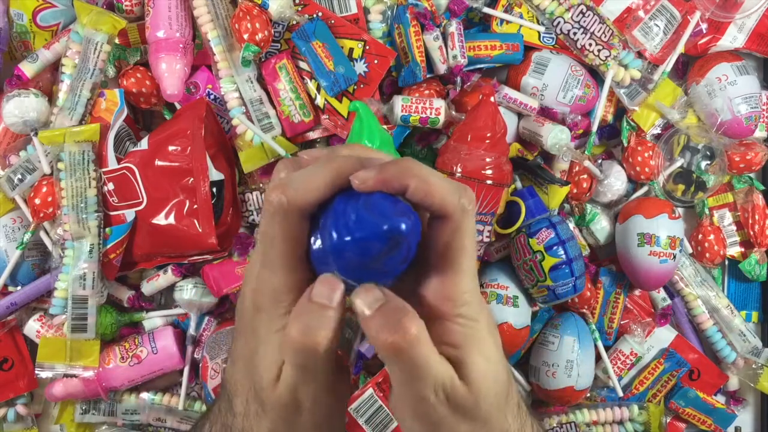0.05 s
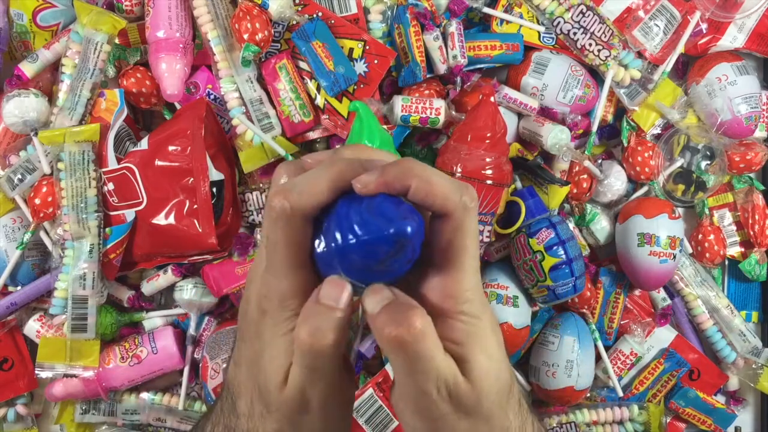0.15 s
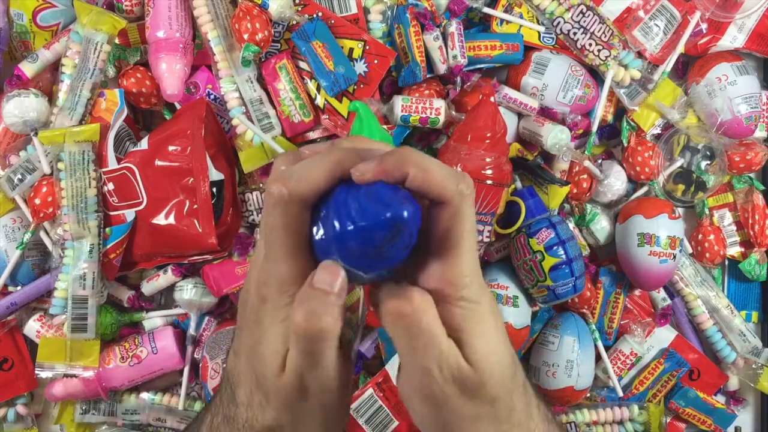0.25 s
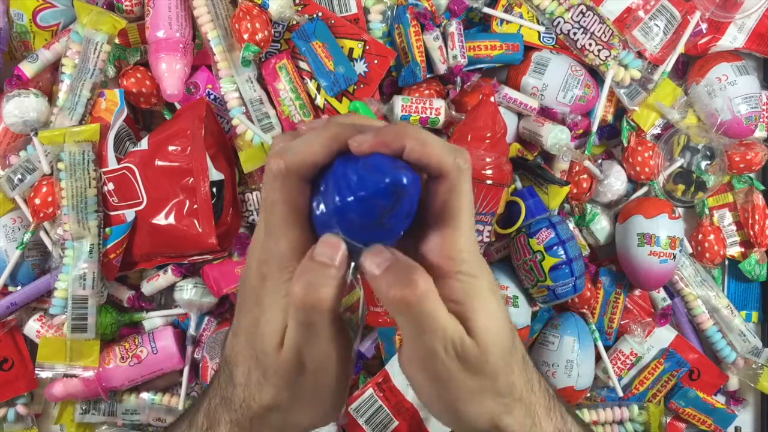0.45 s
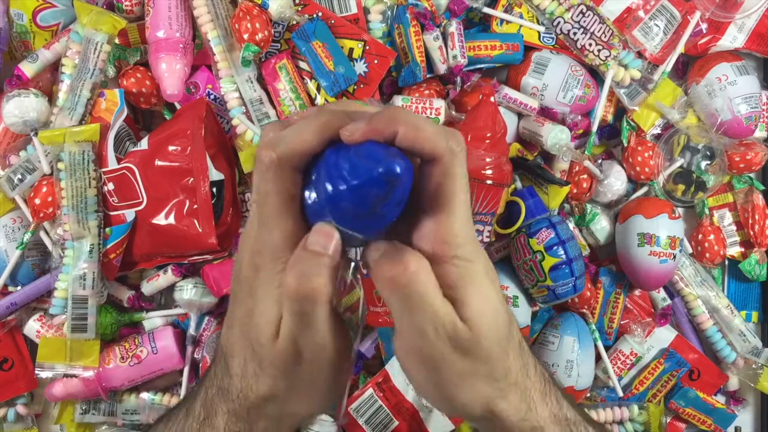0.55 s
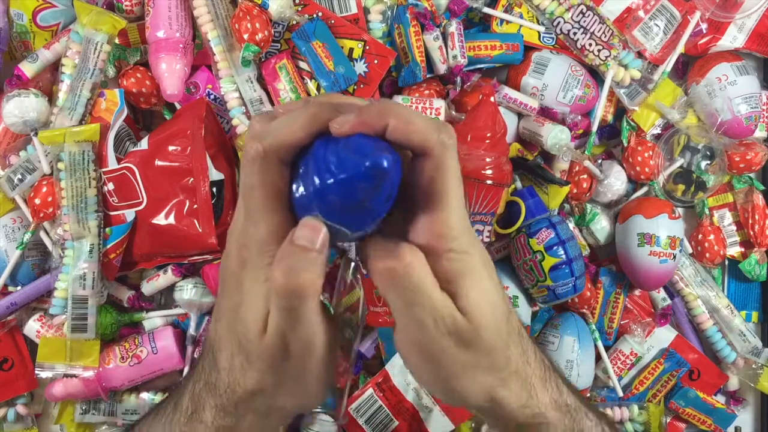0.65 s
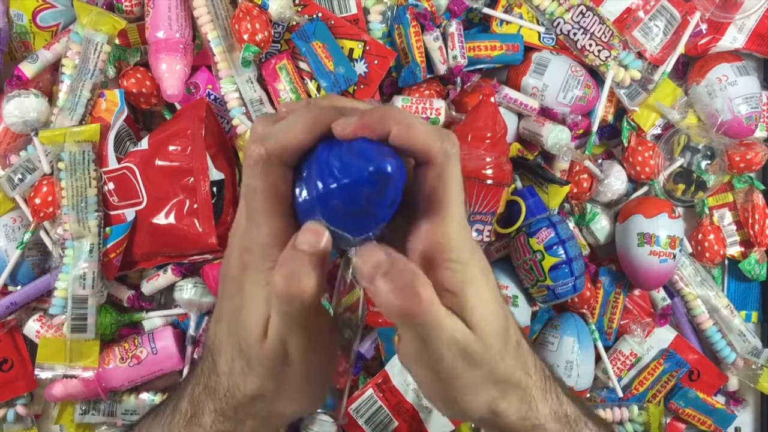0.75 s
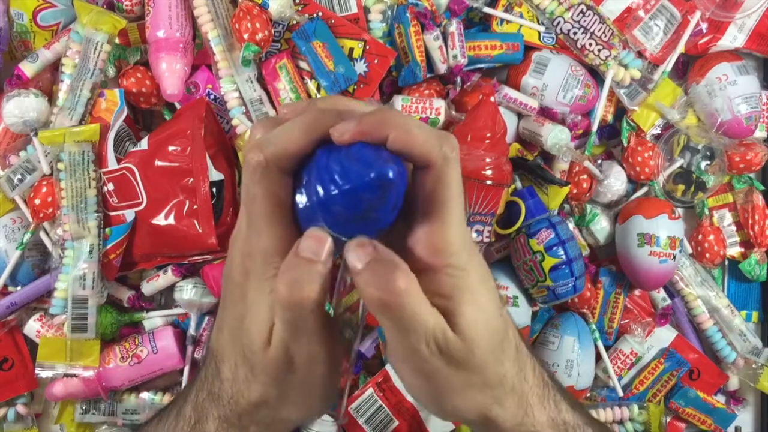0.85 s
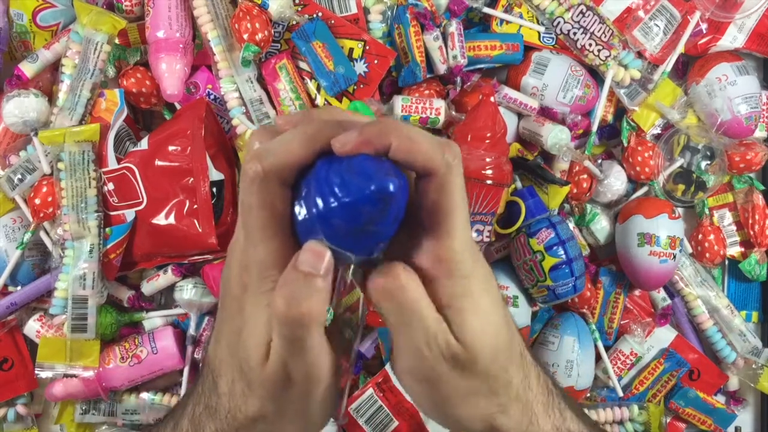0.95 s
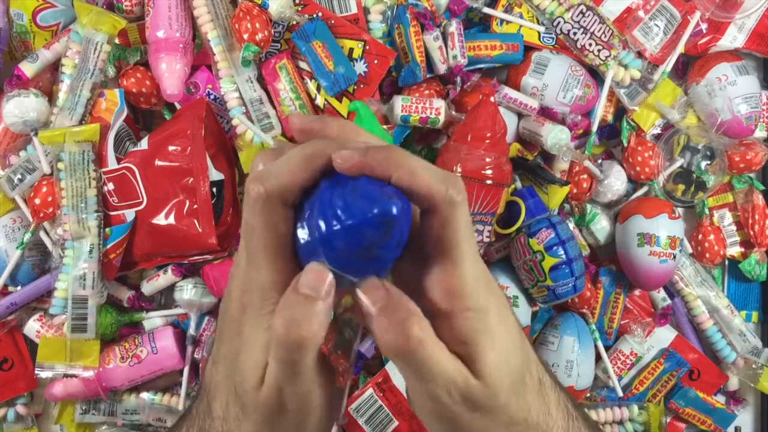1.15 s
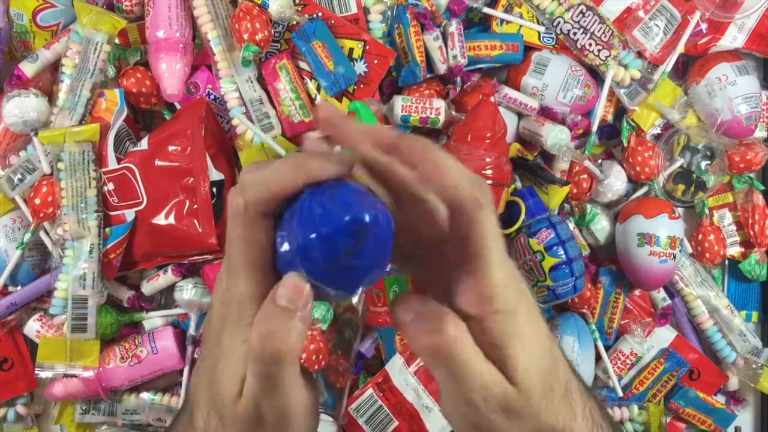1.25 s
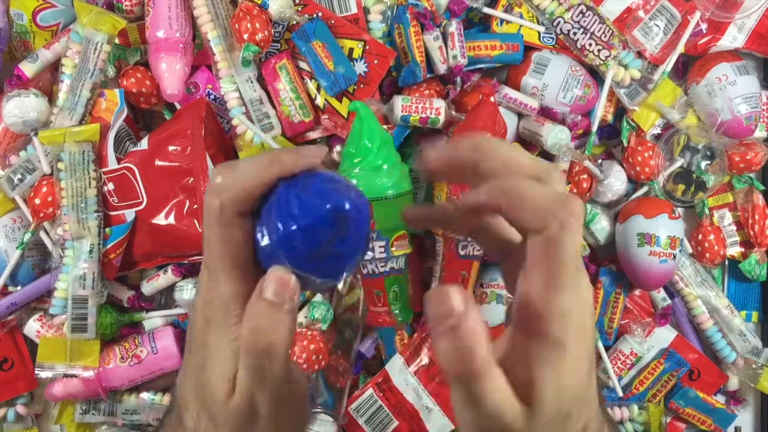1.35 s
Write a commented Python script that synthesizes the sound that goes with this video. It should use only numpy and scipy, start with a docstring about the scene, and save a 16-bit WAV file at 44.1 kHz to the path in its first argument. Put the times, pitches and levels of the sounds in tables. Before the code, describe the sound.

A hollow plastic candy shell snaps sharply in short clusters, close to the microphone in a small room, with fine film ticks; a dull low thud falls between clusters, then faint clicks die away.

```python
"""Sharp plastic snaps in short clusters, fine ticks and rustle, dull distant thuds, a faint squeak, hiss and rumble.
Hands twist a hollow plastic candy shell close to a microphone: each snap of its catch is a set of fading
tones plus a burst of bright noise. Thin film under the fingers is short bursts of high noise.
The thuds are low fading tones with a wash of noise, the squeak is one wavering sine, and a small room
answers the shell and film with fading noise echoes."""
import sys
import numpy as np
from scipy import signal
from scipy.fft import rfft, irfft
from scipy.io import wavfile
from scipy.ndimage import uniform_filter1d

SR = 44100
rng = np.random.default_rng(int(sys.argv[2]) if len(sys.argv) > 2 else 0)


def dump(signal):
    """Clip the signal to [-1, 1] and save it as 16-bit WAV at the path in sys.argv[1]."""
    limited = np.clip(np.atleast_2d(signal).T, -1, 1)
    pcm = np.round(limited * 32767).astype(np.int16)
    wavfile.write(sys.argv[1], SR, pcm)


N = 61739  # length in samples, 1.4 s
T = np.arange(N) / SR  # time of each sample, s


def undb(db):
    """Turn decibels into a plain multiplier."""
    return 10 ** (np.asarray(db) / 20)


def unit(x):
    """Scale to an average (RMS) level of 1."""
    return x / np.sqrt(np.mean(x ** 2))


def colour(x, points):
    """Make some pitches of a noise stronger than others, following (f/Hz, level/dB) points."""
    hz, db = np.array(points).T
    f = np.maximum(np.arange(len(x) // 2 + 1) * SR / len(x), 1)
    gain = undb(np.interp(np.log(f), np.log(hz), db))
    return irfft(rfft(x) * gain, len(x))


def butter(x, order, cut_hz, kind):
    """Filter with a smooth edge: keep the lows, the highs or a band between."""
    return signal.sosfilt(signal.butter(order, cut_hz, kind, fs=SR, output="sos"), x)


def band(x, hz, width_hz):
    """Keep a band of pitches around a centre, its top edge held below the highest possible pitch."""
    low_edge = hz - width_hz / 2
    high_edge = min(hz + width_hz / 2, .49 * SR)
    return butter(x, 2, [low_edge, high_edge], "band")


def ring(modes, scale, push_s, size):
    """A struck object sounds several fading tones (modes); a short half-sine push starts them. Peak 1."""
    t = T[:size]
    tones = np.zeros(size)
    for f, db, t60 in modes:
        fade = np.exp(-np.log(1000) * t / t60)  # down 60 dB after t60
        tones += undb(db) * fade * np.sin(2 * np.pi * f * scale * t)
    push = np.sin(np.pi * np.clip(T[:400] / push_s, 0, 1))
    x = np.convolve(tones, push)[:size]
    return x / np.abs(x).max()


def burst(length_s, size=1500):
    """A quick rise and slower fall in loudness: peak 1, a third of the way through the length."""
    u = 3 * T[:size] / length_s
    return u * np.exp(1 - u)


def add(out, x, s):
    """Mix a short sound into a longer one at time s."""
    i = int(s * SR)
    out[i:i + len(x)] += x[:N - i]


def shell():
    """Every snap rings the hollow shell and throws a short bright crack of noise that fizzles out."""
    # Snaps of the catch: [t/s, ring level/dB, main ring f/Hz, low modes boost/dB, high modes boost/dB,
    # crack level relative to ring/dB, crack length/s]
    snaps = [(0.1885, -21, 1884, -25, 2, -13.5, 0.0021), (0.1909, -29.5, 3430, -20, -6, -25, 0.0026),
             (0.201, -34, 1750, -6, 3, -18, 0.011), (0.2349, -23, 1840, -4, 0, -43, .002),
             (0.2357, -5, 1703, -10, -10, -16, 0.0038), (0.2418, -14.5, 1670, -5, -2, -3, 0.0011),
             (0.2423, -15.5, 1660, -5, -1.5, -18, 0.0032), (0.2676, -37, 1630, -6, -6, -27, .006),
             (.277, -27.5, 1820, -6, -6, -32, .006), (0.483, -36.5, 1780, 1, 0, -11.5, 0.0043),
             (.5703, -26.5, 1710, 8, -6, -14, .002), (.5713, -23.5, 1610, -17, -7, -15.5, 0.0023),
             (.5719, -10.5, 1646, -6, -23, -16.5, 0.0038), (0.601, -36.5, 1590, -10, 0, -2.5, 0.0077),
             (0.6027, -23.5, 1530, -2, -2, -13, 0.008), (.606, -12.5, 1916, -20, -10, -12, 0.0018),
             (0.672, -36, 1580, -6, -3, -29, .006), (0.9278, -15.5, 1840, -8, 0, -20, 0.001),
             (.9293, -6.5, 1703, 10.5, 2, -13, 0.0031), (0.955, -36.5, 1630, 0, 0, 3, 0.0041),
             (0.9599, -14, 1680, 15, 1, -7.5, 0.0023), (0.9629, -15, 1213, -19, 8, -17, 0.0074),
             (0.972, -17.5, 1610, 12, 2, -27, 0.0038), (0.9778, -22.5, 1610, 0, 0, -20, 0.0028),
             (1.1713, -42.5, 1810, 18, -4, 0, 0.0028), (1.2012, -27, 1310, 7, -4, -10.5, 0.002),
             (1.2224, -30.5, 1320, -3, 3, -12, 0.0042), (1.224, -30.5, 1570, -8, 6, -8, 0.0055),
             (1.2267, -31.5, 2150, -10, -6, -23, 0.0022), (1.2302, -34, 1310, 0, 1, -16, 0.005),
             (1.286, -48, 1460, 8, 0, -8.5, 0.0059), (1.311, -40.5, 1480, 3, 0, -20, .005),
             (1.368, -46, 1230, 19, -4, -29, .005)]
    # Modes of the shell: [pitch as a ratio to the main ring, relative level/dB, 60 dB fade time/s]
    shell_modes = [(.1, -22, 0.011), (.17, -10, 0.013), (.3, -13, 0.025), (.56, -50, .015),
                   (.78, -10.5, 0.045), (1, 25, 0.0067), (1.08, 6.5, 0.028), (1.38, -40, 0.017),
                   (1.92, -38, 0.014), (3.5, -39, .01), (5.5, -34, .008)]
    # Tone balance of the crack noise: [f/Hz, relative level/dB]
    crack_colour = [(2500, 1.5), (4000, -4.5), (6500, -3.5), (9500, -2.5), (12000, -3.5), (14500, -4),
                    (16500, 3.5)]
    low_ratio, high_ratio = .7, 1.2  # modes below / above these ratios count as low / high
    push_s = 0.00021
    tail_db, tail_s = -21.5, 0.018  # the fizzle, relative to the start of the crack
    cut_hz = 266  # the shell gives little sound below this

    out = np.zeros(N)
    noise = unit(colour(rng.standard_normal(N), [(300, 3.5)] + crack_colour))
    for s, db, hz, low_db, high_db, crack_db, length in snaps:
        modes = []
        for ratio, mode_db, t60 in shell_modes:
            boost_db = low_db * (ratio < low_ratio) + high_db * (ratio > high_ratio)
            modes.append((ratio, mode_db + boost_db, t60))
        add(out, undb(db) * ring(modes, hz, push_s, size=3000), s)

        crack_env = np.zeros(N)
        tail = undb(tail_db) * burst(tail_s, size=3000)
        add(crack_env, burst(length, size=3000) + tail, s)
        out += undb(db + crack_db) * crack_env * noise
    return butter(out, 2, cut_hz, "high")


def film():
    """Thin film gives lone ticks of high noise, and skin on plastic a faint rustle of tiny random grains."""
    # Ticks: [t/s, level before halving/dB, centre f/Hz, length/s]
    ticks = [(0.0368, -34.5, 10100, 0.0013), (0.0643, -36.5, 14300, 0.0024), (0.116, -49, 13300, 0.0063),
             (0.1725, -49, 9400, 0.0082), (0.335, -41.5, 11000, 0.0038), (0.4952, -42, 15300, 0.0042),
             (0.5211, -56, 12060, 0.004), (0.5344, -64, 11700, 0.003), (0.847, -40.5, 13250, 0.0064),
             (0.8618, -43, 14400, 0.0013), (1.1078, -44.5, 9200, 0.0062), (1.116, -44.5, 9800, 0.0065),
             (1.1567, -56, 11500, 0.0044), (1.1818, -47, 11500, 0.0018), (1.184, -62, 11500, 0.0035)]
    # Base loudness of the rustle grains: [t/s, level/dB]
    rustle_level = [(0, -75.5), (.13, -73.5), (.45, -78.5), (.55, -83), (.85, -73.5), (1.12, -77),
                    (1.25, -68), (1.33, -95), (1.4, -101)]
    tick_width = 0.66  # as a share of the centre pitch
    grains_per_s, scatter_db = 900, 1.6  # average rate, and average random boost of a grain

    out, noise = np.zeros(N), rng.standard_normal(N)
    for s, db, hz, length in ticks:
        env = np.zeros(N)
        add(env, burst(length), s)
        out += .5 * undb(db) * env * unit(band(noise, hz, tick_width * hz))

    start_chance, loud_chance = rng.random((N, 2)).T
    starts = start_chance < grains_per_s / SR
    base_db = np.interp(T, *np.array(rustle_level).T)
    boost_db = -scatter_db * np.log(loud_chance + 1e-9)  # mostly small, now and then large
    grains = starts * undb(base_db + boost_db)
    grain_env = np.convolve(grains, burst(0.0019, size=400))[:N]
    return out + grain_env * unit(band(rng.standard_normal(N), 12350, 7300))


def room(x):
    """Dense echoes build up shortly after the sound, and each band of pitches dies at its own speed."""
    # Echo bands: [centre f/Hz, level before a shared 20 dB cut/dB, 60 dB fade time/s]
    echo_bands = [(144, -10, 0.2), (298, -15, 0.23), (556, -26.5, .45), (1110, -24.5, 0.48),
                  (1775, -26, 0.49), (2700, -31, 0.48), (3560, -31.5, 0.51), (4900, -18.5, 0.5),
                  (10400, -27, 0.4), (14400, -25, 0.34)]
    delay_s, rise_s = 0.0027, 0.0028

    t = np.maximum(T[:SR // 2] - delay_s, 0)
    echoes = np.zeros(len(t))
    for hz, db, t60 in echo_bands:
        echoes += undb(db - 20 - 60 * t / t60) * band(rng.standard_normal(len(t)), hz, .7 * hz)
    echoes *= 1 - np.exp(-t / rise_s)
    return signal.fftconvolve(x, echoes)[:N]


def bumps():
    """Soft blows further off boom in low fading tones; the walls spread them into a dull fading wash."""
    # Beats of the thud: [t/s, peak level/dB]
    beats = [(0.763, -22.5), (0.775, -23.5), (.794, -30), (0.8224, -23), (0.87, -53)]
    # Tones of the boom: [f/Hz, relative level/dB, 60 dB fade time/s]
    boom_modes = [(62, -32, 0.1), (91.8, 5.5, .1), (107, -2.5, 0.23), (122.5, 2, 0.34), (145.9, 7.5, 0.29),
                  (168.4, 8, .1), (262, -23, 0.14)]
    # Noise bands of the wash: [centre f/Hz, level/dB, 60 dB fade time/s]
    wash_bands = [(129.6, -40, 0.81), (324, -45, .45), (530, -42.5, 0.37), (930, -47.5, 0.33),
                  (1670, -51.5, 0.82), (3370, -52.5, 0.52), (5560, -61, 0.7), (11200, -71, 0.98)]
    push_s = 0.0051  # a long push is a soft blow
    wash_start_s, wash_rise_s = .761, 0.00067

    boom = np.zeros(N)
    for s, db in beats:
        add(boom, -undb(db) * ring(boom_modes, 1, push_s, size=14000), s)

    t = np.maximum(T - wash_start_s, 0)
    wash = np.zeros(N)
    for hz, db, t60 in wash_bands:
        wash += undb(db - 60 * t / t60) * unit(band(rng.standard_normal(N), hz, .65 * hz))
    return boom, wash * (1 - np.exp(-t / wash_rise_s))


def squeak():
    """A thin whistle that comes and goes: one gliding sine whose loudness wavers at random."""
    # Path of the whistle: [t/s, f/Hz, level/dB]
    whistle = [(.795, 12950, -73), (.83, 13150, -70), (.86, 13500, -70), (.89, 13250, -70),
               (.925, 12950, -69)]
    waver_depth, waver_hz = .35, 28  # average size, and the fastest strong wavering

    s, hz, db = np.array(whistle).T
    on = uniform_filter1d(1. * (T > s[0]) * (T < s[-1]), size=400)  # softened start and end
    waver = unit(butter(rng.standard_normal(N), 2, waver_hz, "low"))
    tone = np.sqrt(2) * np.sin(2 * np.pi * np.cumsum(np.interp(T, s, hz)) / SR)
    return on * (1 + waver_depth * waver) * undb(np.interp(T, s, db)) * tone


def background():
    """Gently flickering hiss (noise shaped by pitch) over a deep rumble (low noise)."""
    # Tone balance of the hiss: [f/Hz, relative level/dB]
    hiss_colour = [(53, -11), (90, -3.5), (326, -8.5), (423, -3), (1230, -14), (1710, -8.5), (2820, -15),
                   (6750, -27), (14800, -36), (16500, -38)]
    # Loudness of the rumble: [t/s, level/dB]
    rumble_level = [(0.0, -53.5), (0.198, -59), (0.298, -57), (0.594, -54.5), (0.72, -50.5), (0.828, -44),
                    (1.066, -58.5), (1.156, -56.5), (1.4, -53.5)]
    hiss_db, flicker_db = -64.5, 0.5
    rumble_top_hz = 55.6

    steps = np.repeat(rng.standard_normal(N // 2000 + 1), 2000)[:N]  # a new random value every 45 ms
    flicker = unit(uniform_filter1d(steps, size=2000))
    hiss = unit(colour(rng.standard_normal(N), [(30, -41)] + hiss_colour))
    hiss *= undb(hiss_db + flicker_db * flicker)

    low = butter(rng.standard_normal(N + SR), 2, [16, rumble_top_hz], "band")
    rumble = unit(low[SR:])  # skip the first second, while the filter settles
    s, db = np.array(rumble_level).T
    return hiss + rumble * undb(np.interp(T, s, db))


def scene():
    """Mix all layers; the echoes of room() answer only the shell and film."""
    near = shell() + film()
    boom, wash = bumps()
    return (near + room(near) + boom + wash + squeak() + background())[None]


def record(dry):
    """The top is cut: a very steep filter removes nearly all sound above 15900 Hz."""
    return signal.sosfilt(signal.ellip(8, .2, 75, 15900, fs=SR, output="sos"), dry)


dry = scene()
out = record(dry)
dump(out)
```